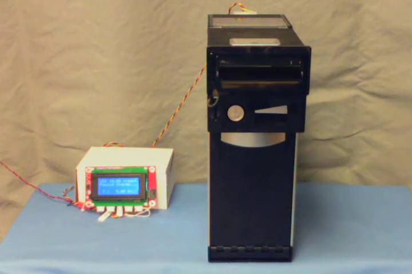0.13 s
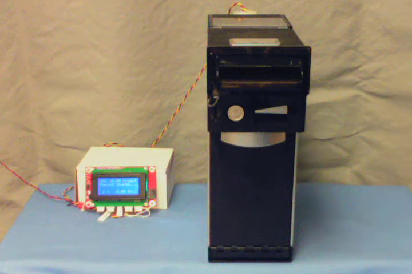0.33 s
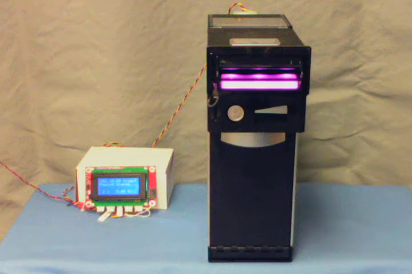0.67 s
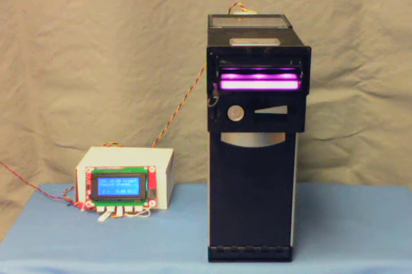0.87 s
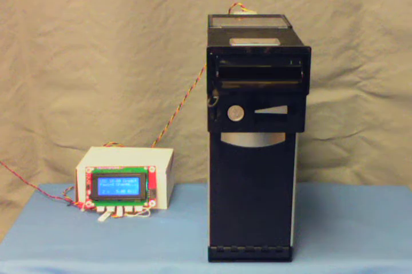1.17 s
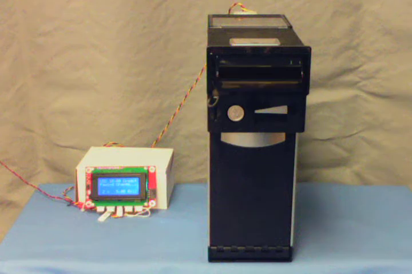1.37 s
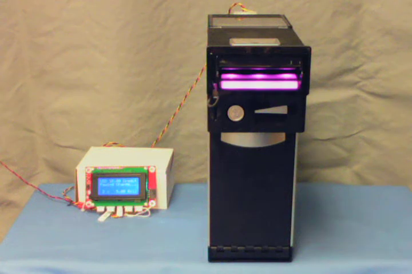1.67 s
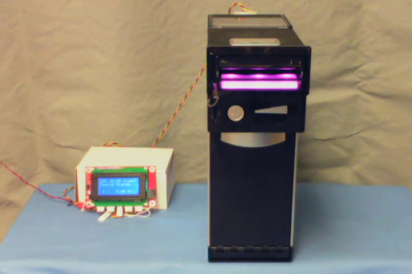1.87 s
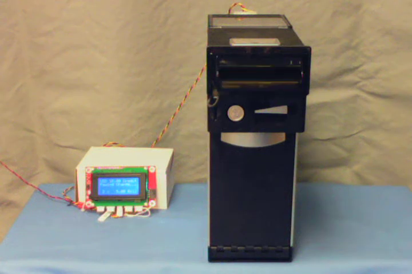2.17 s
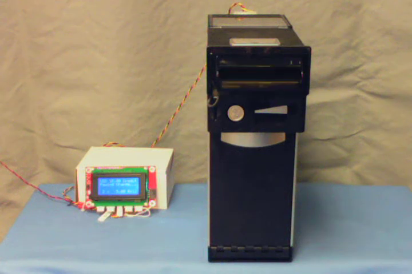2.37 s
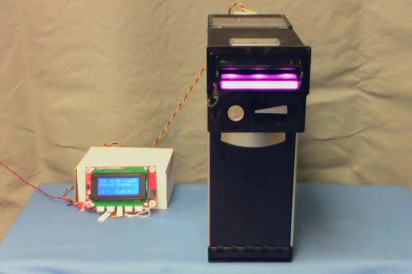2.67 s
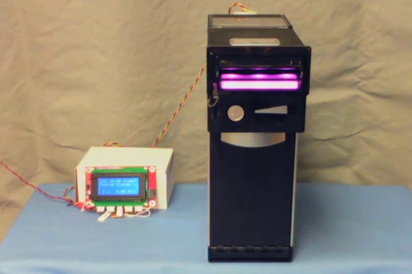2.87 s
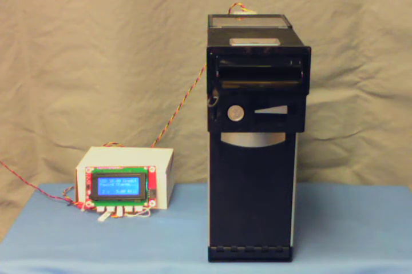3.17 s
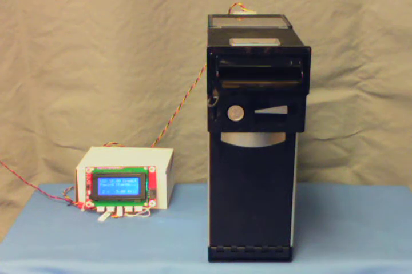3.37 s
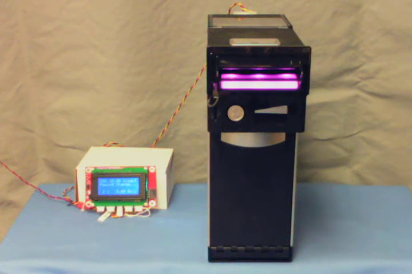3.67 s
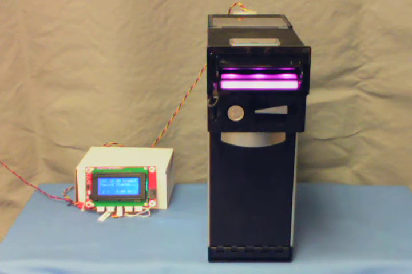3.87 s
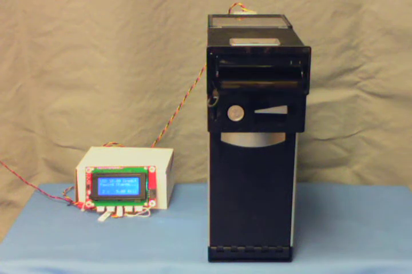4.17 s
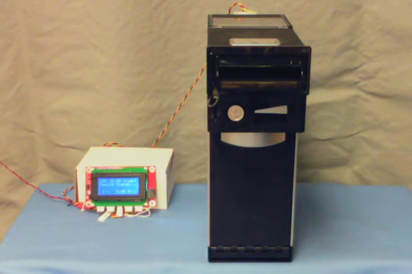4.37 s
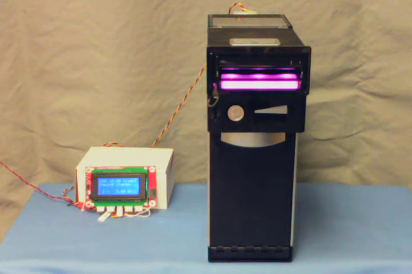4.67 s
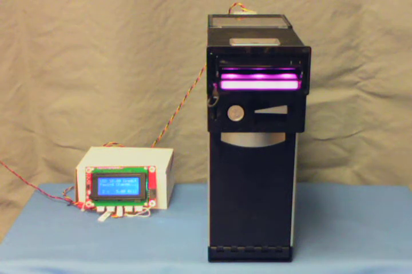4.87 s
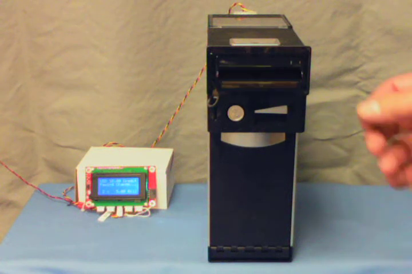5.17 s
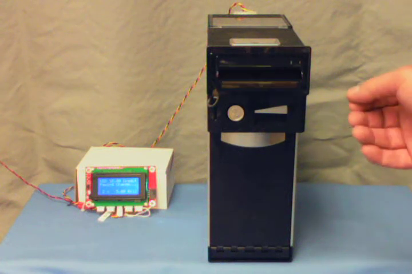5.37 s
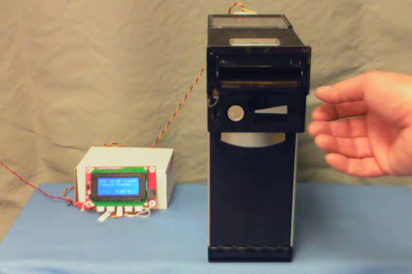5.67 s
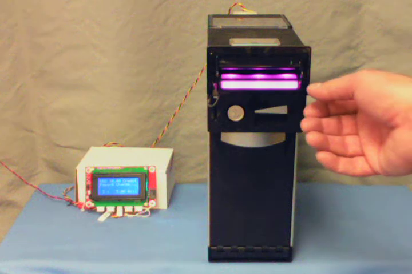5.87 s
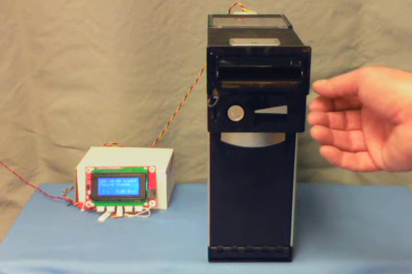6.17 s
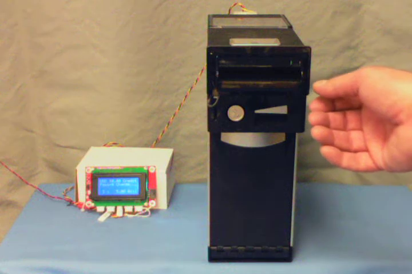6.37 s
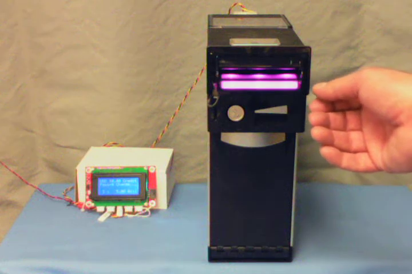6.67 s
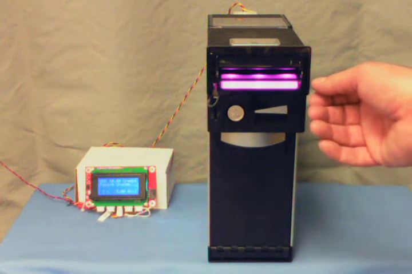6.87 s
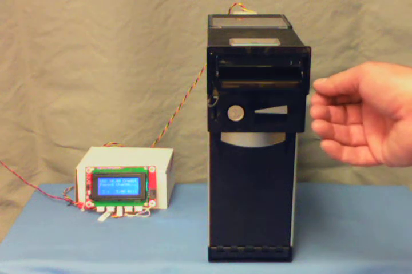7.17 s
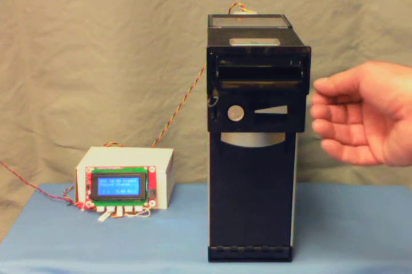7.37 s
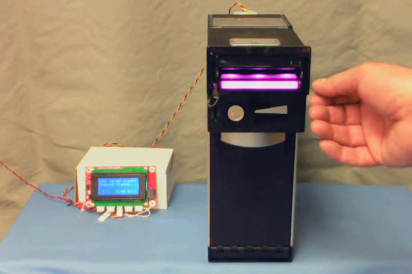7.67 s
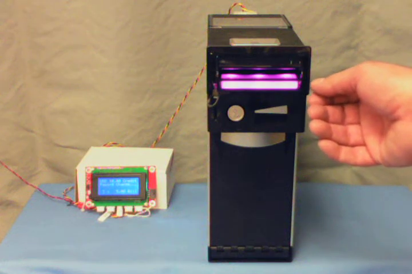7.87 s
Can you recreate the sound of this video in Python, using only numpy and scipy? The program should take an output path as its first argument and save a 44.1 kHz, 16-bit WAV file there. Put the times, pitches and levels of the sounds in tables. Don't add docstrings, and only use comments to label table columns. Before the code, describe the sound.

Two soft rising and falling motor whirs, faint latch ticks, a steady rattling gear run, then sharp clicks and two short feeding bursts over low hum.

```python
import sys
import numpy as np
from scipy import signal
from scipy.fft import rfft, irfft, next_fast_len
from scipy.io import wavfile
from scipy.ndimage import uniform_filter1d

SR = 44100
rng = np.random.default_rng(int(sys.argv[2]) if len(sys.argv) > 2 else 0)


def persist_wave(psi):
    counts = np.round(np.clip(psi, -1, 1) * 32767).astype(np.int16)
    wavfile.write(sys.argv[1], SR, np.atleast_2d(counts).T)


def level_to_linear(level):
    exponent = np.asarray(level, float) / 20
    return 10 ** exponent


N = 353241
T = np.arange(N) / SR

# (wall [pitch_hz, density_db], resonances [pitch_hz, width_hz, level_db])
RUN_BODY = [(71, -44), (120, -19), (272, -16), (362, -5.5), (630, -13), (892, -2.5), (1160, -19),
            (2340, -4), (2930, -16), (4980, -14.5), (5410, -18.5), (16000, -23)], [(356.8, 40.5, 2),
            (856, 36, -4.5), (1280, 24, -9), (1776, 14, -4), (2420, 250, -9), (3564, 230, -8.5),
            (4070, 140, -13), (4880, 100, -9.5), (5800, 110, -16.5), (6860, 71, -14), (9310, 82, -14.5),
            (10960, 130, -20)]
FEED_BODY = [(71, -38), (120, -18), (246, -26), (348, -8), (473, -12), (839, -9.5), (1120, -16),
             (1790, -11), (3820, -15.5), (16000, -25)], [(350, 28, -1), (834, 110, -4.5), (1860, 250, -3.5),
             (2610, 33, -3), (3750, 140, -4), (3850, 17, -8), (4760, 160, -5.5), (5850, 44, -6.5),
             (9750, 220, -11), (10900, 120, -22)]
PULL_BODY = [(71, -49), (120, -22), (314, -12), (630, -19), (911, -18), (1160, -23), (1490, -13),
             (4590, -17.5), (14200, -23.5), (16000, -22)], [(317, 11, -2), (887, 69, -14), (1580, 140, -15),
             (2050, 55, -26), (3560, 75, -9), (4470, 62, -8), (5280, 50, -33), (6070, 72, -12)]
# start_s, running_s, level_db, middle_db, treble_db
BURSTS = [
    (3.893, 1.818, -41.5, 0.5, -12.5),
    (7.258, 0.352, -47.5, 1, -12),
    (7.628, 0.54, -40.5, -1, -10.5),
]
# time_s, speed_turns_per_s
SPEED = [(3.88, 33.3), (4.2, 33.3), (4.3, 31.13), (5.9, 31.13), (7.25, 29.3), (7.6, 29.3), (7.63, 26.6),
         (8.01, 26)]
MESH = 10, 11, 12, 13, 16, 27, 28, 30, 75
MESH_DB = -6, -4, 0, -8, -9, -7, -2, -8, -10
ROLLER_RATIO = 0.47
START_S, STOP_S, SPIN_UP_S = 0.02, 0.041, 0.037
COLD_MID_DB, COLD_TOP_DB = -7, -13
WORN_SHARE = 0.07

RAMP_BODY = [(71, -44), (120, 0.5), (341, 3), (418, -5), (483, 0.5), (546, -10), (839, -7), (1340, -36),
             (8310, -49.5), (11800, -40.5), (16000, -47.5)], [(345, 36, 3), (655, 59, -5),
             (2260, 650, -37.5), (6230, 760, -42)]
# time_s, effort_db, tooth_hz
WHIRS = [
    [(.1, -76, 400), (.33, -62, 444), (.66, -55, 610), (.76, -49.5, 706), (.96, -45.5, 980),
     (1.13, -46, 1083), (1.29, -48, 870), (1.345, -58.5, 740), (1.45, -85, 600)],
    [(1.45, -80, 300), (1.6, -55.5, 350), (1.72, -57.5, 410), (1.9, -54, 520), (2.05, -49, 674),
     (2.3, -48, 878), (2.45, -48, 750), (2.55, -48, 694), (2.66, -78, 603)],
    [(4.45, -69, 400), (4.7, -47.5, 600), (5.1, -44, 900), (5.4, -46.5, 796), (5.55, -63, 600)],
]
# middle_db, treble_db, tooth_tone_db, panel_tones_db
WHIR_COLOUR = [(-15.5, -19, -13, -28.5), (-16, -22.5, -8, -37), (-22, -42, -30, -50)]
# width_hz, patchiness_db, pitches_khz
PANELS = [(220, 3, [3.8, 5.9, 7.05, 12.7]), (160, 4, [1.85, 2.7, 3.4, 3.9, 5.1, 6.1]), (200, 3, [4])]
FULL_HZ, BRIGHTER_DB, TOOTH_DB = 900, 4, 6.5
# pitch_hz, level_db
COIL = [(500.6, -64.5), (2003, -74), (2503, -79.5), (4506, -83.5)]
# start_s, hold_s, level_db
COIL_ON = [(.2, 1.05, -77), (1.612, .36, -76), (2.05, 0.22, -79), (2.3, .22, -76)]

# start_s, length_s, from_hz, to_hz, peak_db
GROANS = [(0.362, .36, 343, 345, -62), (0.729, 0.18, 263, 440, -48), (.92, .1, 476, 498, -42),
          (1.01, 0.18, 474, 504, -56), (1.69, .47, 158, 355, -48.5), (2.244, .38, 376, 340, -52),
          (6.039, 0.084, 336, 345, -43), (7.32, 0.1, 220, 170, -48), (7.48, .16, 175, 180, -53.5)]
# (start_s, length_s, from_hz, to_hz, peak_db)
WHISTLES = [([4, 6], (.78, .2, 890, 1060, -73)), ([4, 6], (.94, .3, 1020, 1180, -70)), ([5],
            (.98, .25, 1050, 1170, -71)), ([1], (7.68, .36, 4640, 4500, -54)), ([2, 3, 3.6, 4.2],
            (2.05, .45, 880, 960, -77))]
SQUEAK = 7.645, .055, 2300, 2650, -45
CRACKLE = 8, 0.2, .3, .05, -58

SLIDE_BODY = [(71, -31), (120, -10), (157, 6), (839, -4.5), (1210, -20.5), (2700, -19), (3170, -28),
              (7200, -31), (11500, -20), (16000, -27)], [(810, 83, -9), (2400, 610, -23)]
# start_s, hold_s, level_db
RUBS = [
    (2.949, .24, -52.5),
    (6.199, .3, -52.5),
]
# peak_s, rise_s, fall_s, level_db
BUMPS = [(2.91, .015, 0.079, -47), (3.8, .06, 0.11, -50.5), (6.08, .07, 0.065, -39.5),
         (7.218, .05, 0.055, -57), (7.345, .05, 0.096, -39.5)]
# middle_db, treble_db
RUB_COLOUR = (-8.5, -17.5)
BUMP_COLOUR = (-21, -34)
THUDS = .033, [(1.6352, -65, -40, -68, 903), (3.7863, -58, -49, -67, 834), (3.8417, -62, -39, -70, 820),
         (7.2014, -66, -50, -71, 790)]
SNAPS = .033, [(3.0235, -57, -47, -48.5, 10400), (5.3974, -38, -43, -36.5, 9700),
         (6.5124, -46.5, -51, -49, 9000), (5.738, -46, -44, -47, 8000)]
CLICKS = 0.051, [(2.8968, -51, -45, -56, 2680), (3.1842, -45, -45, -52, 2700),
          (6.3994, -41, -42.5, -56, 2360), (7.3355, -30, -39, -29, 5960), (7.3395, -29, -38, -32, 2100),
          (7.6415, -39, -34.5, -42.5, 2470)]
RATTLES = 0.083, [(2.9931, -51.5, -46, -68, 2700), (3.0314, -49.5, -46.5, -71, 2540),
           (3.0594, -53, -49, -64, 2400), (6.1893, -57, -55, -67, 1540), (6.3859, -48, -55, -53, 2650),
           (7.2784, -47, -51, -71, 1870)]

# pitch_hz, t60_s
ROOM = [(150, 0.73), (1000, 0.31), (4000, 0.23), (12000, 0.071)]
FAN = 129.5, -69, -60, 5.5
# pitch_hz, density_db
FLOOR = [(10, -34), (18, 1), (49, 9), (78, -0.5), (98, -25), (170, -16.5), (500, -26), (1000, -31.5),
         (3000, -38.5), (7000, -42.5), (11000, -44.5), (15500, -44.5), (16500, -62)]
FLOOR_DB = -48.5
# pitch_hz, width_hz, level_db
HUM = [(672, 2.2, -75), (662, 160, -76.5), (9900, 55, -87.5)]
WHINE = 11666.2, 136.4, -3
# level_db, sign
SIDEBANDS = [(-95, -1), (-90, 1), (-84, -1), (-74, 1), (-76, 1), (-85, -1), (-90, 1), (-95, 1)]
# first_s, period_s, pitch_hz, width_hz, level_db
BLIPS = (-.02, .1985, 15550, 600, -80)
OFFSET = 0.0027


def transport(burst, body, shaft_db, roller_db, mesh_db):
    start, running, db, mid_db, top_db = burst
    s, t, level_db = envelope(start, START_S, running, STOP_S, db)
    cold = np.exp(-(t - s) / SPIN_UP_S) + (db - level_db) / 10 * (t > s + running)
    mid_db, top_db = mid_db + COLD_MID_DB * cold, top_db + COLD_TOP_DB * cold
    angle = np.cumsum(np.interp(t, *np.transpose(SPEED))) / SR + 0.4
    worn = np.interp((angle % 1) * 1400, np.arange(1400), rng.standard_normal(1400))
    shaft = 2 * np.pi * (angle - 0.2)
    throb_db = shaft_db * (np.cos(shaft) - 0.24 * np.sin(2 * shaft))
    throb_db += roller_db * np.cos(2 * np.pi * (ROLLER_RATIO * angle - 0.04))
    drive = np.sqrt(1 - WORN_SHARE) * chatter(len(t), 20000, 0.99) + np.sqrt(WORN_SHARE) * evened(worn)
    drive *= level_to_linear(throb_db + 1.4 * drift(len(t), 17))
    case = housing(drive, body, level_db, mid_db, top_db + 1.13 * throb_db)
    gears = np.zeros(len(t))
    for multiple, tone_db in zip(MESH, MESH_DB):
        strength = level_to_linear(tone_db + 2.5 * drift(len(t), 9))
        gears += strength * np.sin(2 * np.pi * (multiple * angle + rng.random()))
    return s, (case + level_to_linear(level_db + mesh_db) * gears) * np.minimum((t - s) / 0.0027, 1)


def ramp(rows, colour, panels):
    s, t, (level_db, hz) = columns(rows)
    mid_db, top_db, tooth_db, panel_db = colour
    octaves = np.log2(hz / FULL_HZ)
    drive = chatter(len(t), 9000, 1.5) * level_to_linear(0.8 * drift(len(t), 14))
    grind = housing(drive, RAMP_BODY, level_db, mid_db + 3 * octaves, top_db + BRIGHTER_DB * octaves)
    tooth = glide(0.97 * hz, level_db + tooth_db + TOOTH_DB * octaves, 59, 2.6, [1])
    panel_tones = glide(1000 + 0 * hz, level_db + panel_db, *panels)
    return s, grind + tooth + panel_tones


def chatter(size, per_s, spread_db):
    hit = rng.random(size) < per_s / SR
    strength, sign = rng.exponential(1, size), rng.standard_normal(size)
    return evened(hit * level_to_linear(spread_db * np.minimum(strength, 4)) * sign)


def housing(drive, body, level_db, mid_db, top_db):
    wall, modes = body

    def gain(hz):
        ring = sum(level_to_linear(2 * db) / (1 + (2 * (hz - f) / w) ** 2) ** 1.32 for f, w, db in modes)
        return np.sqrt(level_to_linear(2 * (read(wall, hz) - 0.5)) + ring * (hz > 100))

    low, mid, top = bands(drive, gain)
    return level_to_linear(level_db) * (low + level_to_linear(mid_db) * mid + level_to_linear(top_db) * top)


def coil(start, hold, db):
    s, t, level_db = envelope(start, 0.03, hold, 0.079, db, 15)
    return s, sum(level_to_linear(tone_db + level_db + 77.5) * np.sin(2 * np.pi * hz * t) for hz, tone_db in COIL)


def sweep(row, width, patchy_db, multiples, dip_db):
    s, length, from_hz, to_hz, db = row
    u = np.linspace(0, 1, round(length * SR))
    hz = from_hz * (to_hz / from_hz) ** u
    return s, glide(hz, db - dip_db * (2 * u - 1) ** 2, width, patchy_db, multiples)


def crackle(shape):
    s, t, level_db = envelope(*shape, 14)
    bursts = signal.lfilter([1], [1, -0.93], abs(chatter(len(t), 260, 2.5)))
    snaps = bursts * rng.standard_normal(len(t))
    return s, level_to_linear(level_db) * evened(resonate(resonate(snaps, 13000, 3000), 13000, 3500))


def slide(shape, colour):
    s, t, level_db = shape
    drive = chatter(len(t), 8000, 1.6) * level_to_linear(1.4 * drift(len(t), 40))
    rub = housing(drive, SLIDE_BODY, level_db, *colour)
    return s, level_to_linear(-3.0) * rub * signal.windows.tukey(len(t), 0.1)


def tick(s, level_db, bass_db, top_db, hz, t60):
    t = np.arange(6000) / SR

    def gain(f):
        return (f > 300) * (0.4 + 1 / (1 + ((f - hz) / (0.16 * hz)) ** 2))

    def fade(factor, rise_s):
        return level_to_linear(-60 * t / (t60 * factor)) * np.minimum(t / rise_s, 1)

    low, mid, top = bands(rng.standard_normal(len(t)), gain)
    sound = level_to_linear(bass_db) * low * fade(0.55, 0.001)
    sound += level_to_linear(level_db) * mid * fade(0.68, 0.002)
    sound += level_to_linear(top_db) * top * fade(0.9, 0.00039)
    return s - 0.001, sound


def room(x):
    taps = np.zeros(SR // 2)
    at = np.arange(300, len(taps) - 20, 20)
    taps[at + rng.integers(0, 20, len(at))] = rng.choice([-1., 1.], len(at))
    hz, t, z = signal.stft(taps, SR, nperseg=256)
    tail = signal.istft(z * level_to_linear(-60 * t / read(ROOM, hz)[:, None]), SR, nperseg=256)[1]
    return signal.fftconvolve(x, tail / np.linalg.norm(tail))[:N]


def fan():
    hz, db, louder_db, s = FAN
    level_db = np.interp(T, [s - 0.15, s + 0.15], [db, louder_db])
    return glide(hz * np.ones(N), level_db, 10, 0.86, [0.94])


def background():
    size = next_fast_len(N)
    density = level_to_linear(read(FLOOR, np.fft.rfftfreq(size, 1 / SR)))
    air = irfft(rfft(rng.standard_normal(size)) * density, size)[:N]
    buzz = sum(level_to_linear(db) * fuzzy(N, hz, width) for hz, width, db in HUM)
    centre, step, lowest = WHINE
    whine = np.zeros(N)
    for k, (db, sign) in enumerate(SIDEBANDS):
        whine += sign * np.sqrt(2) * level_to_linear(db) * np.sin(2 * np.pi * (centre + step * (lowest + k)) * T)
    first, period, hz, width, db = BLIPS
    gate = uniform_filter1d(1. * ((T - first) % period < 0.025), 300)
    blips = level_to_linear(db) * fuzzy(N, hz, width) * gate
    return level_to_linear(FLOOR_DB) * evened(air) + buzz + whine + blips


def glide(hz, level_db, width, patchy_db, multiples):
    tones = np.zeros(len(hz))
    for k in multiples:
        tones += level_to_linear(patchy_db * drift(len(hz), 13.0)) * fuzzy(len(hz), k * hz, width)
    return level_to_linear(level_db) * tones * signal.windows.tukey(len(hz), 0.1)


def fuzzy(size, hz, width):
    return evened(resonate(resonate(rng.standard_normal(size), hz, width), hz, width))


def resonate(x, hz, width):
    turn = np.exp(2j * np.pi * np.cumsum(hz * np.ones(len(x))) / SR)
    r = np.exp(-np.pi * width / SR)
    return 2 * (turn * signal.lfilter([1 - r], [1, -r], x / turn)).real


def bands(x, gain):
    size = next_fast_len(len(x))
    hz = np.fft.rfftfreq(size, 1 / SR)
    z = rfft(x, size) * gain(hz)
    below, under = 1 / (1 + (hz / 1150) ** 12), 1 / (1 + (hz / 6000) ** 12)
    return [evened(irfft(z * share, size)[:len(x)]) for share in (below, under - below, 1 - under)]


def drift(size, hz):
    smooth = uniform_filter1d(rng.standard_normal(size), int(SR / hz / 4) + 1)
    return evened(signal.lfilter([1], [1, -np.exp(-2 * np.pi * hz / SR)], smooth))


def envelope(s, rise, hold, fall, level_db, depth_db=22):
    at = s + np.cumsum([0, rise, hold, fall])
    s, t, (db,) = columns(np.transpose([at, level_db - depth_db * np.array([1, 0, 0, 1])]))
    return s, t, db


def columns(rows):
    s, *values = np.transpose(rows)
    t = np.arange(s[0], s[-1], 1 / SR)
    return s[0], t, [np.interp(t, s, v) for v in values]


def read(points, hz):
    f, value = np.transpose(points)
    return np.interp(np.log(hz + 1), np.log(f + 1), value)


def evened(x):
    return x / np.sqrt(np.mean(x ** 2) + 1e-20)


def add(mix, s, sound):
    part = mix[round(s * SR):][:len(sound)]
    part += sound[:len(part)]


def scene():
    machine, latches = fan(), np.zeros(N)
    sounds = [transport(BURSTS[0], RUN_BODY, shaft_db=1.2, roller_db=1.1, mesh_db=-8),
              transport(BURSTS[1], FEED_BODY, shaft_db=0.0, roller_db=0.4, mesh_db=-17),
              transport(BURSTS[2], PULL_BODY, shaft_db=0.4, roller_db=0.2, mesh_db=-12)]
    sounds += [ramp(*whir) for whir in zip(WHIRS, WHIR_COLOUR, PANELS)]
    sounds += [coil(*row) for row in COIL_ON]
    sounds += [sweep(row, 16.3, 0.44, [1], 13.8) for row in GROANS]
    sounds += [sweep(row, 85, 1.8, multiples, 9) for multiples, row in WHISTLES]
    sounds += [sweep(SQUEAK, 400, 0.5, [0.97, 1.56], 12), crackle(CRACKLE)]
    sounds += [slide(envelope(s, 0.016, hold, 0.058, db), RUB_COLOUR) for s, hold, db in RUBS]
    sounds += [slide(envelope(s - rise, rise, 0, fall, db), BUMP_COLOUR) for s, rise, fall, db in BUMPS]
    for sound in sounds:
        add(machine, *sound)
    for t60, rows in (THUDS, SNAPS, CLICKS, RATTLES):
        for row in rows:
            add(latches, *tick(*row, t60))
    reverberation = level_to_linear(-16.5) * room(machine) + level_to_linear(-9.0) * room(latches)
    return (machine + latches + reverberation + background())[None]


def low_pass(x):
    return signal.sosfilt(signal.butter(12, 16530, fs=SR, output="sos"), x)


def record(dry):
    edge = signal.firwin(1023, 15800, window=("kaiser", 8), fs=SR)
    mix = signal.oaconvolve(dry, edge[None], "same") + OFFSET
    return low_pass(mix)


dry = scene()
out = record(dry)
persist_wave(out)
```